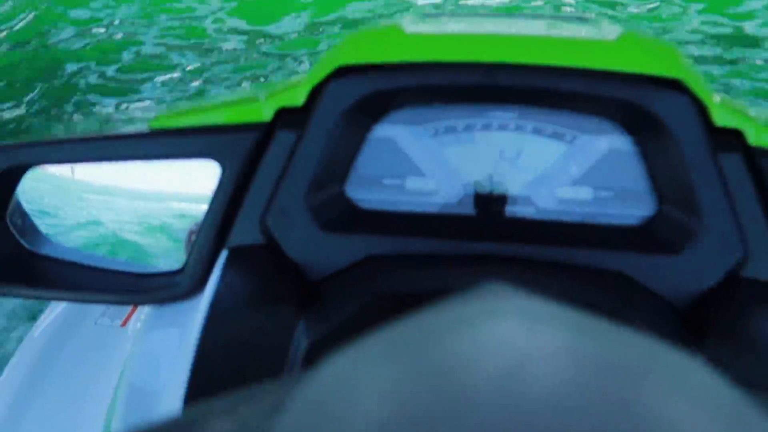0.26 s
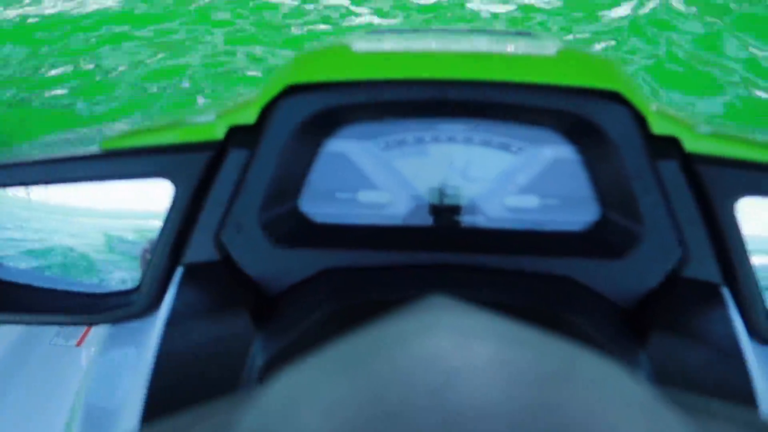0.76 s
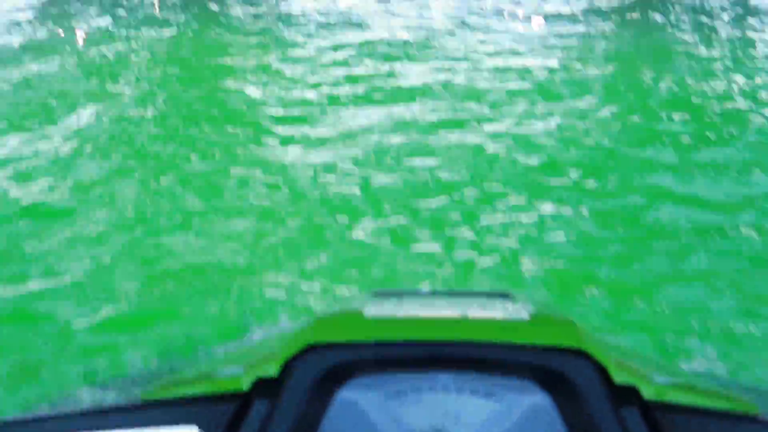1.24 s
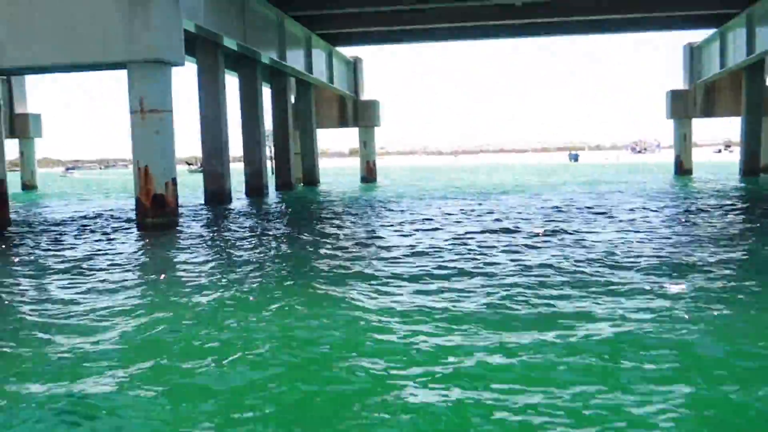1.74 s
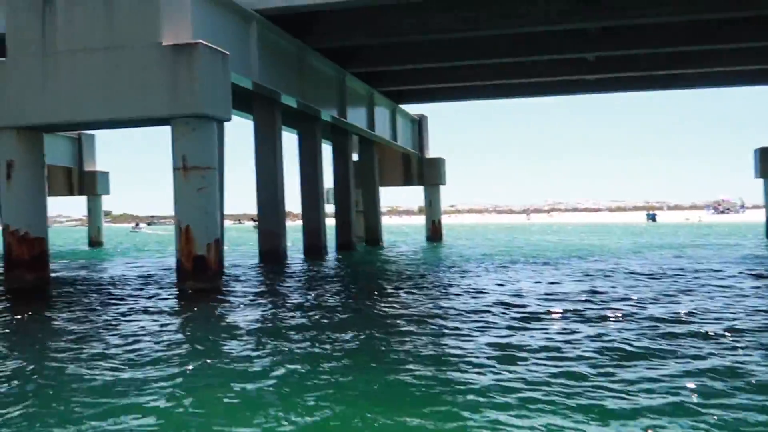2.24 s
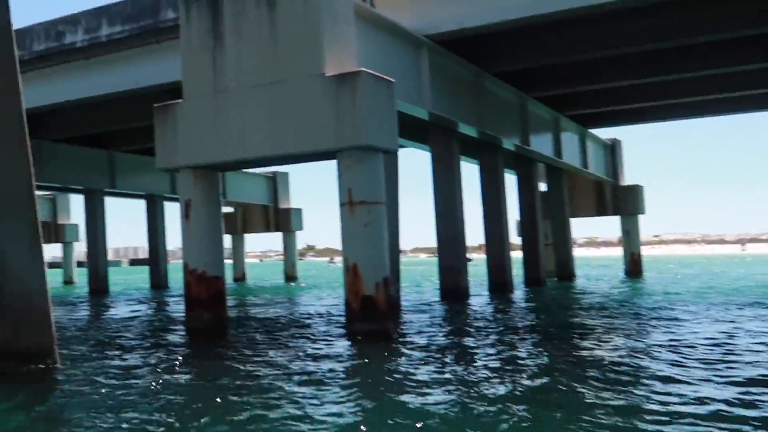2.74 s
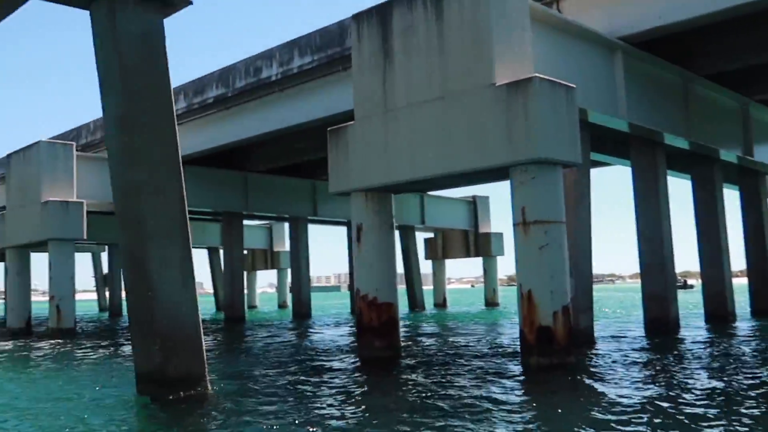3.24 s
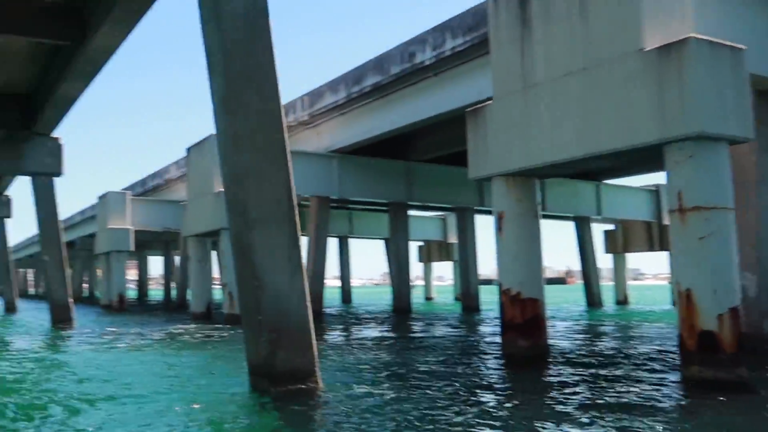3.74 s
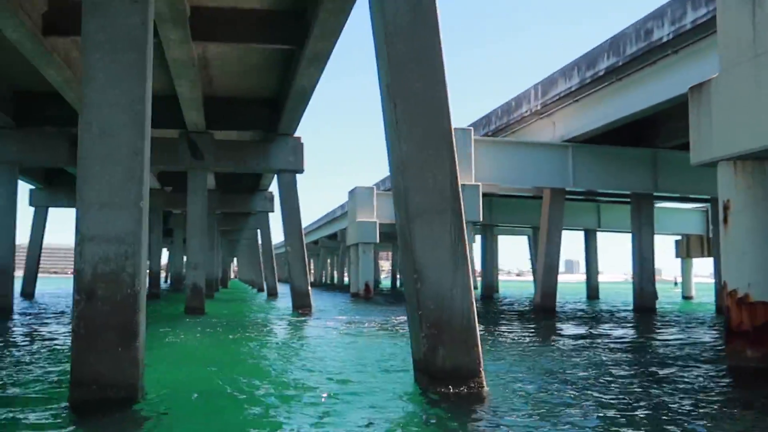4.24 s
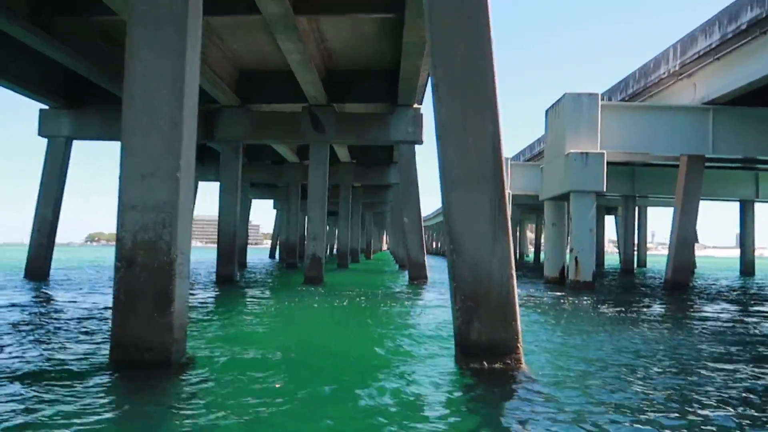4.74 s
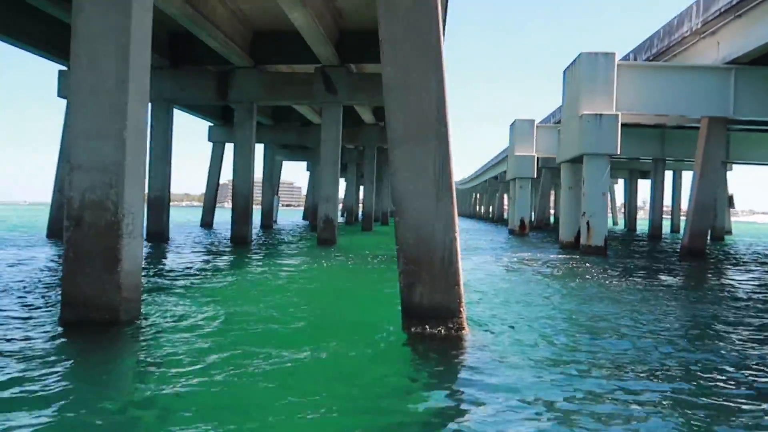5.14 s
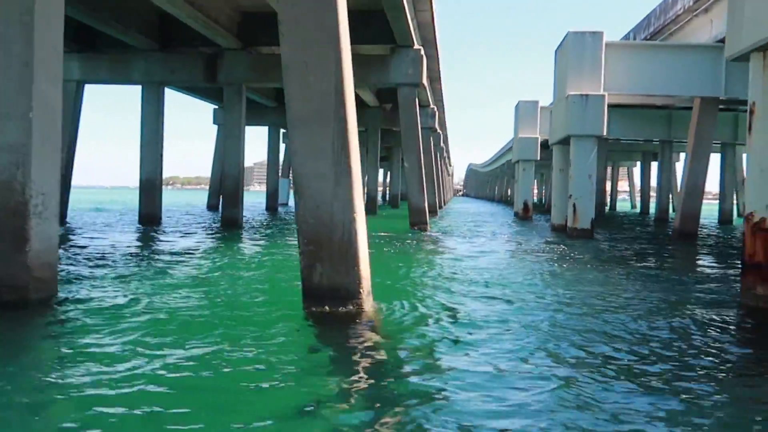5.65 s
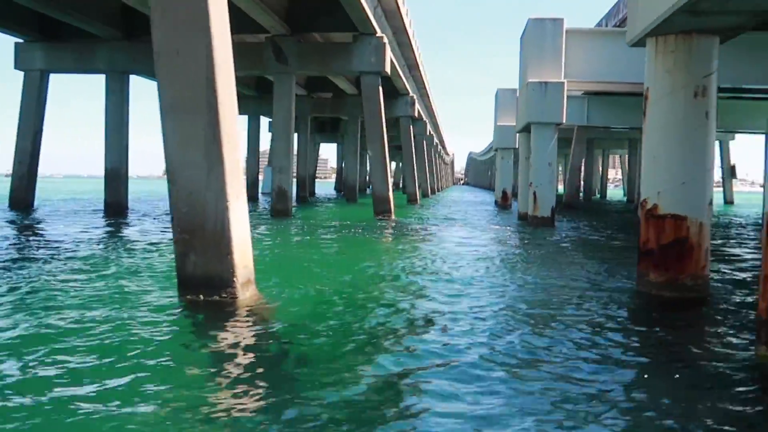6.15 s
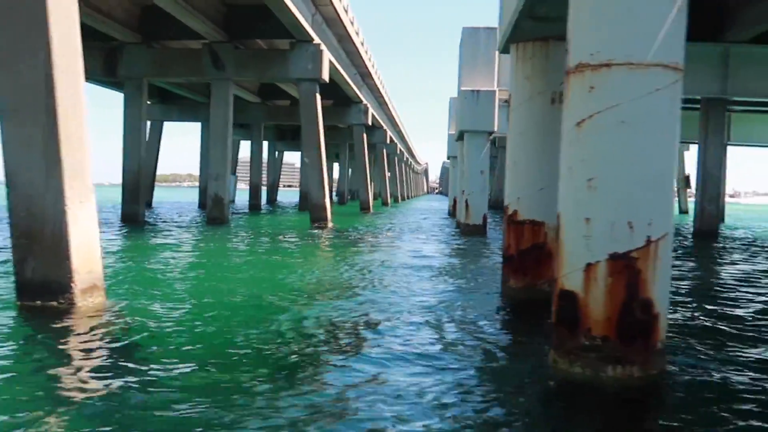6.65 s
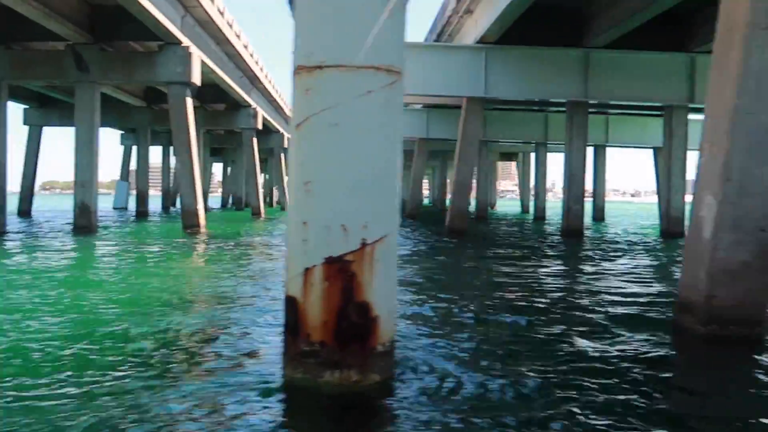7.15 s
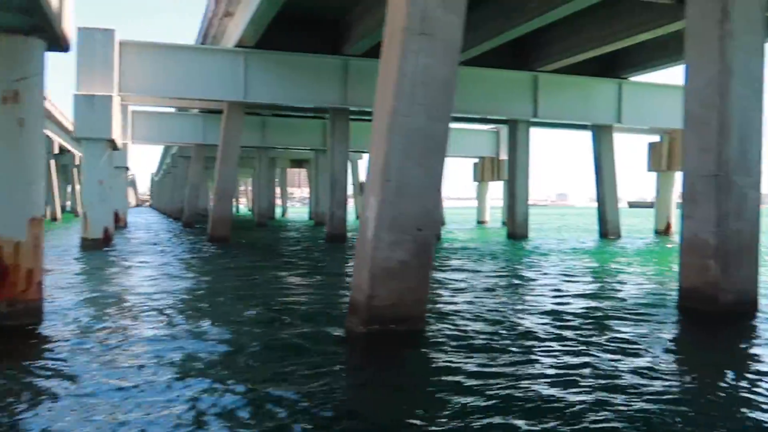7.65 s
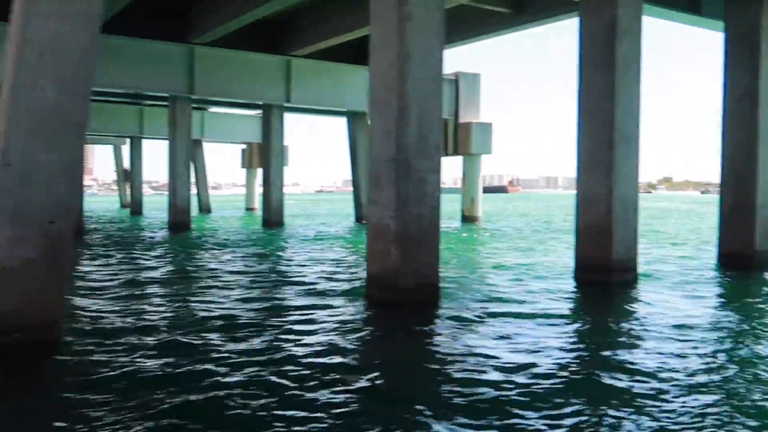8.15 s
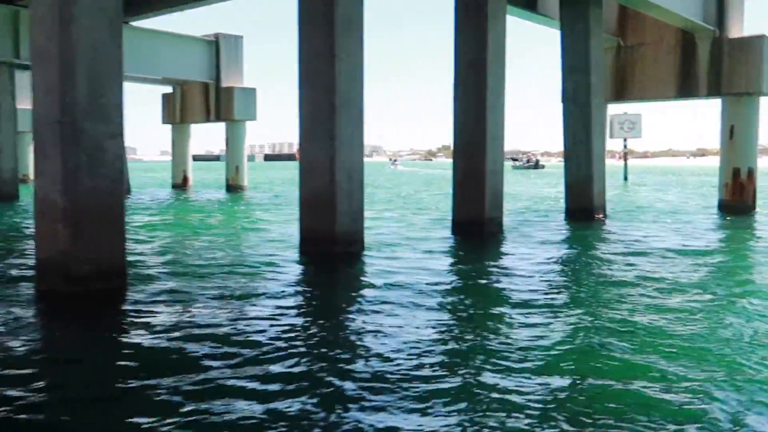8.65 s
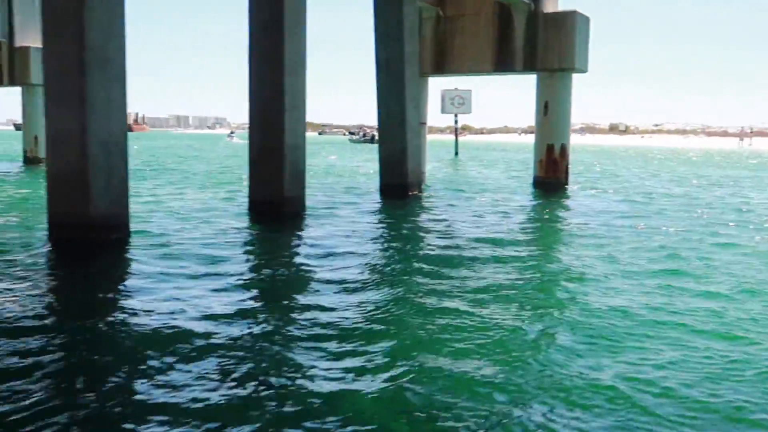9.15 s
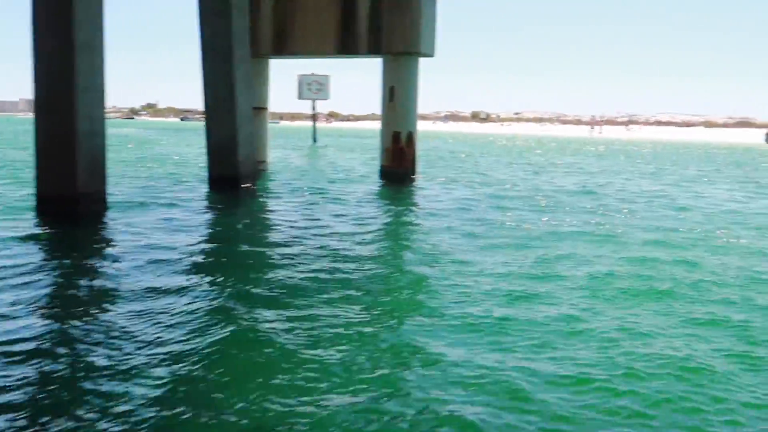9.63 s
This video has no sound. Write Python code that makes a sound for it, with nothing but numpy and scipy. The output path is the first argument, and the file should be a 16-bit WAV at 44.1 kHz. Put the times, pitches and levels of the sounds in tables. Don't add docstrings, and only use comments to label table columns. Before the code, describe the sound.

A close, onboard stereo capture of a small watercraft running steadily on open water and beneath a concrete bridge. The strong low motor hum stays nearly central, with rough undertones and small pitch sags and surges. Soft mid-bright spray surrounds it, shifting left then returning to centre. Gurgling wake and dull hull slaps lie underneath. Wind rumbles in gusts from the middle onward, with faint ticks and late rounded bubble plops.

```python
import sys
import numpy as np
from scipy import signal
from scipy.fft import rfft, irfft, next_fast_len
from scipy.io import wavfile
from scipy.ndimage import uniform_filter1d

SR = 44100
rng = np.random.default_rng(int(sys.argv[2]) if len(sys.argv) > 2 else 0)


def bounce(signal):
    frames = np.transpose(np.atleast_2d(signal))
    limited = np.clip(frames, -1, 1)
    pcm = np.round(limited * 32767).astype(np.int16)
    wavfile.write(sys.argv[1], SR, pcm)


def magnitude_from_level(level_db):
    exponent = np.asarray(level_db, float) / 20
    return 10 ** exponent


N = 436149
STEP = 8
HZ = np.fft.rfftfreq(1024, 1 / SR)
FRAME_S = np.arange(N // 256 + 5) * 256 / SR

CRUISE_HZ = 73.3
CALM_DB = -32
FIRST_DB, SECOND_DB, THIRD_DB, UNEVEN_DB = 0.65, -10.5, -22, -0.06
CHURN_DB, THUMP_DB = -27, -42.5
THIRD_SHARE, UNEVEN_SHARE, WAKE_SHARE, THUMP_SHARE, BRIGHT_SHARE = .45, 0.72, 0.99, .8, 0.081
SHADE_DB_PER_US = -0.0883

# multiple of the engine cycle, level in dB facing the console, level in dB facing the piers.
UNEVEN_ORDERS = [(2, -40, -46), (4, -42, -35.5), (5, -47.5, -39.5), (7, -41.5, -36), (8, -42.5, -30.5),
                 (10, -39, -37.5), (11, -35.5, -38), (12, -25, -35.5), (13, -40, -31.5), (13.9, -31.5, -36),
                 (15, -37, -37.5), (16, -50.5, -50), (17, -47, -47), (18, -42, -39), (20, -39.5, -46),
                 (21.1, -35.5, -46), (42.33, -46, -44.5)]
# time in seconds, facing from 0 console to 1 piers.
FACING_CURVE = [(0, 0), (2.5, 0.6), (5, 0.94), (6, 0.88), (9.89, 1.0)]
# time in seconds,
# change in Hz, half length in seconds.
PUMP_SURGES = [(0.21, -1.0, 0.12), (0.74, 0.8, 0.08), (0.96, -1.2, 0.4), (1.19, -0.7, 0.08),
               (1.72, 0.7, 0.08), (2.43, -0.8, 0.4), (2.75, 0.9, 0.08), (2.98, -1.0, 0.08),
               (3.26, 1.1, 0.08), (3.71, -0.9, 0.12), (4.01, -0.6, 0.08), (4.21, 0.9, 0.08),
               (4.93, -0.8, 0.12), (5.62, 1.1, 0.08), (5.9, -1.3, 0.08), (6.07, 1.8, 0.4), (6.2, 1.0, 0.08),
               (6.61, -0.7, 0.08), (7.23, 1.4, 0.12), (8.01, 0.9, 0.08), (8.33, 1.6, 0.12),
               (8.77, -1.7, 0.08), (9.12, 1.7, 0.12), (9.78, 1.8, 0.08)]
# time in seconds, depth in dB,
# half length in seconds.
EXHAUST_FADES = [(.17, -4, 0.045), (1.16, -4, 0.043), (1.53, -8, 0.041), (2.07, -7.5, .07),
                 (2.24, -5, 0.088), (2.8, -6, 0.082), (3.08, -3, 0.05), (3.27, -6.5, 0.032),
                 (3.52, -3.5, .06), (3.8, -4.5, .12), (4.2, -5, 0.19), (4.62, -7, 0.069), (4.34, -1.5, .03),
                 (4.88, -1.5, 0.072), (5.2, -1.5, 0.43), (5.8, -4.5, 0.065), (6.11, -7.5, 0.03),
                 (6.32, -0.5, .04), (7.15, -3.5, 0.15), (7.34, -6.5, 0.07), (7.81, -6, 0.043),
                 (8.02, -5, 0.042), (8.15, -3.5, 0.22), (3.95, -6, .03), (8.65, -3.5, 0.083),
                 (8.76, -8, 0.032), (8.9, -6, 0.069), (9.38, -4.5, .05), (9.66, -3.5, 0.096),
                 (9.87, -5.5, 0.087)]
# time in seconds, depth in dB,
# half length in seconds.
HUM_LULLS = [(.75, -5, 0.024), (1.07, -4, .06), (1.65, -3, .2), (2.27, -2, .04), (2.68, -4, 0.053),
             (3.3, -5.5, .06), (3.95, -2.5, 0.044), (4.45, -7, 0.096), (5.05, -6, 0.08), (5.5, -1.5, 0.14),
             (6.8, -9.5, .14), (7.65, -5, 0.097), (8.6, -5, .1), (9.35, -4, 0.091)]
# time in seconds,
# echo in dB, half length in seconds, beats per second.
PIER_ECHOES = [
    (4.109, -5, 0.18, 7.7),
    (5.36, -9, 0.25, 6.7),
    (6.456, -19.5, 0.21, 7.3),
    (7.649, -13, 0.091, 7),
    (8.513, -2.5, 0.05, 8),
]
# time in seconds, spray level in dB, engine load in dB.
RIDE_SWELL = [(0, -33.5, -25), (.28, -32, -23.5), (.55, -35, -26.5), (1.15, -34.5, -27), (2.38, -31, -24),
              (2.6, -34.5, -26), (3.6, -31, -22.5), (3.88, -31, -20.5), (4.25, -27, -20), (4.9, -29.5, -20),
              (5.3, -31, -21.5), (6.35, -32, -22), (6.8, -34, -23.5), (8.15, -31, -21.5), (8.6, -32.5, -23),
              (8.93, -27.5, -20), (9.3, -32.5, -25), (9.89, -30, -23)]
# time in seconds, rise in dB, half length in seconds.
SPRAY_SHEETS = [(.7, 1, .05), (1.63, 0.5, 0.023), (2.42, 1.5, .05), (2.98, 1.5, 0.035), (3.63, 1, .05),
                (4.82, 2, 0.061), (5.05, 1.5, .06), (5.8, 1.5, 0.11), (6.15, 1.5, .08), (7.05, 2, 0.069),
                (7.55, 2.5, 0.084), (9.58, 0.5, 0.077), (9.88, 0, .03)]
# frequency in Hz, level in dB per Hz.
SPRAY_COLOUR = [(200, -23.5), (400, -8), (600, 0), (1050, -4), (1250, -6), (2000, -11), (3350, -18.5),
                (7000, -29.5), (8700, -36), (12000, -38), (13200, -45.5), (14300, -61), (16000, -79.5)]
# frequency in Hz, likeness from 0 to 1.
SPRAY_FOCUS = [(100, .99), (630, 0.98), (1400, 0.95), (3000, 0.84), (6600, .7), (9000, 0.6), (14000, 0.7)]
# time in seconds, lead of the left port in microseconds.
CAMERA_PAN = [(0, 6.5), (1.4, -0.5), (3, 7), (4.3, 29.5), (5.25, 31.5), (6.1, 55.5), (7.35, 61.5),
              (8.75, 1), (9.89, 1.5)]
# frequency in Hz, level in dB per Hz.
WAKE_COLOUR = [(30, -43), (60, -2), (100, -2), (190, -8), (300, -4.5), (450, -11.5), (800, -22),
               (2000, -69.5)]
# frequency in Hz, level in dB per Hz.
THUMP_COLOUR = [(8, -43), (20, -12), (35, 8.5), (55, 16.5), (90, 1), (150, -53)]
# time in seconds, rise in dB, half length in seconds.
HULL_SLAPS = [(0.27, 10, 0.17), (0.87, 10, 0.093), (1.19, 5, 0.044), (3.29, 0.5, 0.17), (4.39, 2, 0.031),
              (4.67, 0.5, 0.034), (4.88, 3.5, 0.12), (5.2, 1, 0.11), (6.29, 4.5, 0.084), (7.31, 4, 0.097),
              (7.94, 3, 0.15), (8.27, 6, 0.13), (8.81, 9, 0.13), (9.84, 4, 0.04)]
# start in seconds, level in dB, pitch in Hz.
BUBBLE_BURSTS = [
    (2.067, -26, 820),
    (8.35, -20.5, 945),
    (8.838, -18.5, 717),
    (8.863, -19, 720),
    (9.526, -14, 804),
    (9.571, -21, 864),
    (9.638, -16, 820),
    (9.671, -21, 740),
    (9.709, -20, 869),
]
# start in seconds, level in dB, pitch in Hz.
HOUSING_DROPS = [
    (1.285, -31, 6530),
    (3.5887, -28, 5800),
    (4.6405, -29.5, 4960),
    (4.685, -18, 2700),
    (4.752, -26.5, 5040),
    (5.545, -27, 2730),
    (5.57, -33.5, 5020),
]
# time in seconds, level in dB.
WIND_GUSTS = [(0, -43), (1.5, -44), (2.6, -46), (3.3, -40.5), (3.75, -40), (4.2, -36), (5.3, -29.5),
              (5.6, -33), (5.85, -29), (6.1, -35), (6.4, -33.5), (6.8, -44.5), (7.55, -29.5), (8.55, -44),
              (8.95, -35), (9.4, -47), (9.89, -34)]
# frequency in Hz, level in dB per Hz.
WIND_COLOUR = [(15, -58), (40, -31.5), (65, -12.5), (95, -1.5), (150, 5), (340, -7.5), (460, -9),
               (600, -26.5), (1500, -72.5)]
# frequency in Hz, gain in dB on the left-right difference.
STEREO_WIDENING = [(500, -0.5), (3000, 1), (7000, 4.5), (9000, 8), (12500, 8.5), (14000, 15), (15500, 17.5)]


def engine():
    t = np.arange(0, N, STEP) / SR
    firing_hz = CRUISE_HZ + bumps(PUMP_SURGES, t) + .12 * wander(rate_hz=4.5)
    firing = 2 * np.pi * np.cumsum(firing_hz) * STEP / SR
    wash_db, load_db = follow(RIDE_SWELL, t)
    swell_db = wash_db - CALM_DB
    first_db = FIRST_DB + load_db + .7 * wander(rate_hz=2.4)
    second_db = SECOND_DB + bumps(EXHAUST_FADES, t)
    third_db = THIRD_DB + THIRD_SHARE * swell_db + bumps(HUM_LULLS, t) + 1.1 * wander(rate_hz=9)
    shade_db = SHADE_DB_PER_US * follow(CAMERA_PAN, t)[0]
    uneven_db = UNEVEN_DB + UNEVEN_SHARE * swell_db + shade_db
    echo = pier_echo(t)
    out = np.zeros(len(t))
    harmonics = [(1, first_db, 0.38, 0.85), (2, second_db, 0.86, 0.19), (3, third_db, 0.86, 1.36)]
    for order, db, flutter_db, lag in harmonics:
        tone = np.exp(1j * (order * firing - lag + 0.14 * order * wander(rate_hz=8)))
        if order == 2:
            tone = tone * echo
        out += magnitude_from_level(db + flutter_db * wander(rate_hz=20)) * tone.real
    facing = np.clip(follow(FACING_CURVE, t)[0], 0, 1)
    for order, console_db, piers_db in UNEVEN_ORDERS:
        drift = 2 * np.pi * rng.random() + (order / 30) ** 2 * wander(rate_hz=7)
        view_db = console_db + facing * (piers_db - console_db)
        level_db = view_db + uneven_db + 1.3 * wander(rate_hz=1.1)
        out += magnitude_from_level(level_db) * np.cos(np.round(order) * firing / 3 + drift)
    return np.sqrt(2) * signal.resample_poly(out, STEP, 1)[:N]


def pier_echo(t):
    echo = np.ones(len(t), complex)
    for s, db, half_s, beat_hz in PIER_ECHOES:
        echo -= bumps([(s, magnitude_from_level(db), half_s)], t) * np.exp(-2j * np.pi * beat_hz * (t - s))
    return echo


def spray():
    level_db = wash(FRAME_S)
    bright_db = 0.45 + BRIGHT_SHARE * (level_db - CALM_DB)
    tilt_db = bright_db * np.log2(HZ[:, None] / 1200 + .1)
    flicker_db = 1.0 * rng.standard_normal(len(FRAME_S))
    gain = colour(SPRAY_COLOUR) * magnitude_from_level(level_db + 7.5 + flicker_db + tilt_db)
    lead_s = 0.98 / 1.11e6 * follow(CAMERA_PAN, FRAME_S)[0]
    lead = np.clip(2 * np.pi * HZ[:, None] * lead_s, -np.pi, np.pi)
    half = np.exp(.5j * lead) * magnitude_from_level(.9 * np.sin(lead) + 0.07)
    focus = np.clip(read(SPRAY_FOCUS, HZ), 0, 1)
    direct, left, right = (field(1.05, bins=12, frames=10) for _ in range(3))
    directed = np.sqrt(focus) * direct * np.array([half, 1 / half])
    scattered = np.sqrt(1 - focus) * np.array([left, right])
    return sound(gain * (directed + scattered))


def droplets():
    landing = rng.random(N) < 350 / SR
    size = magnitude_from_level(4.2 * np.minimum(rng.exponential(1, N), 3.5)) * landing
    kind = rng.integers(0, 24, N)
    t = np.arange(256) / SR
    out = np.zeros((2, N))
    for k, hz in enumerate(np.geomspace(1200, 9000, num=24)):
        envelope = t * hz * np.exp(-t * hz / 1.3)
        grain = np.sin(2 * np.pi * hz * t) * envelope * (1200 / hz) ** 1.3
        out[k % 2] += signal.oaconvolve(size * (kind == k), grain)[:N]
    level_db = wash(np.arange(N) / SR)
    return magnitude_from_level(level_db - 16.5) * evened(out + 0.66 * out[::-1])


def wake():
    wash_db = wash(FRAME_S) - CALM_DB
    slap_db = bumps(HULL_SLAPS, FRAME_S)
    gurgle_db = 0.84 * evened(uniform_filter1d(rng.standard_normal(len(FRAME_S)), size=9))
    churn_db = CHURN_DB + WAKE_SHARE * wash_db + .4 * slap_db + gurgle_db + 5.0
    churn = colour(WAKE_COLOUR) * magnitude_from_level(churn_db) * field(2.2, bins=3, frames=8)
    thump_db = THUMP_DB + THUMP_SHARE * wash_db + 1.7 * slap_db + 4.5
    thump = colour(THUMP_COLOUR) * magnitude_from_level(thump_db) * field(1.5, bins=3, frames=8)
    return sound(churn + thump)


def splashes():
    out, t = np.zeros(N + 4000), np.arange(4000) / SR
    for s, db, hz in BUBBLE_BURSTS:
        envelope = magnitude_from_level(db - 1100 * t) * (1 - np.exp(-t / 0.002))
        out[round(s * SR):][:4000] += envelope * np.sin(2 * np.pi * hz * t * (1 + 1.3 * t))
    for s, db, hz in HOUSING_DROPS:
        envelope = magnitude_from_level(db - 0.5 - 7600 * t)
        out[round(s * SR):][:4000] += envelope * np.sin(2 * np.pi * hz * t * (1 + 40 * t))
    return out[:N]


def wind():
    gain = colour(WIND_COLOUR) * magnitude_from_level(follow(WIND_GUSTS, FRAME_S)[0] + 10.0)
    return sound(gain * np.array([field(5.1, bins=4, frames=8) for port in range(2)]))


def wash(t):
    return follow(RIDE_SWELL, t)[0] + bumps(SPRAY_SHEETS, t)


def bumps(rows, t):
    s, size, half_s = np.transpose(rows)
    bells = np.exp(-.5 * ((FRAME_S[:, None] - s) / half_s) ** 2)
    return np.interp(t, FRAME_S, bells @ size)


def follow(rows, t):
    s, *columns = np.transpose(rows)
    return [np.interp(t, s, c) for c in columns]


def read(points, hz):
    f, value = np.transpose(points)
    return np.interp(np.log(hz + 1), np.log(f + 1), value)[:, None]


def evened(x):
    return x / np.sqrt(np.mean(abs(x) ** 2) + 1e-20)


def wander(rate_hz):
    coarse = rng.standard_normal(N // 64 + 2)
    hz = np.fft.rfftfreq(len(coarse), 64 / SR)
    smooth = irfft(rfft(coarse) / (1 + (hz / rate_hz) ** 4), len(coarse))
    return evened(np.interp(np.arange(0, N, STEP) / 64, np.arange(len(coarse)), smooth))


def field(patchy_db, bins, frames):
    a, b, patches = rng.standard_normal((len(FRAME_S), len(HZ), 3)).T
    patches = uniform_filter1d(uniform_filter1d(patches, bins, 0), frames, 1)
    return (a + 1j * b) * magnitude_from_level(patchy_db * evened(patches))


def colour(points):
    gain = magnitude_from_level(read(points, HZ))
    return gain / np.sqrt(.75 * np.sum(gain ** 2) * 4)


def sound(z):
    return signal.istft(z, nperseg=1024, noverlap=768)[1][..., :N]


def scene():
    hull = engine() * magnitude_from_level(np.array([[.1], [-.1]]))
    return hull + wake() + splashes() + spray() + wind() + droplets()


def top_cut(x):
    return signal.sosfilt(signal.butter(12, 15180, fs=SR, output="sos"), x)


def record(dry):
    mid, side = (dry[0] + dry[1]) / 2, (dry[0] - dry[1]) / 2
    size = next_fast_len(N)
    widening = magnitude_from_level(read(STEREO_WIDENING, np.fft.rfftfreq(size, 1 / SR))[:, 0])
    side = irfft(rfft(side, size) * widening, size)[:N]
    limited = 0.93 * np.tanh(np.array([mid + side, mid - side]) / 0.99)
    bass_cut = signal.butter(2, 15, "high", fs=SR, output="sos")
    return top_cut(signal.sosfilt(bass_cut, limited))


dry = scene()
out = record(dry)
bounce(out)
```